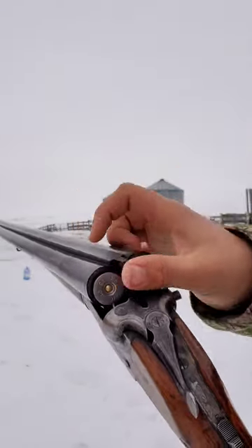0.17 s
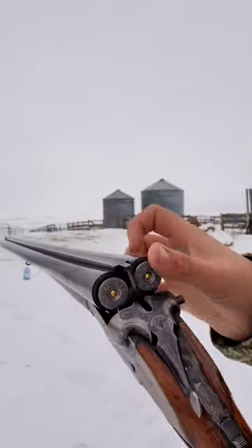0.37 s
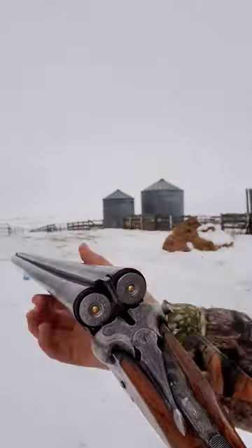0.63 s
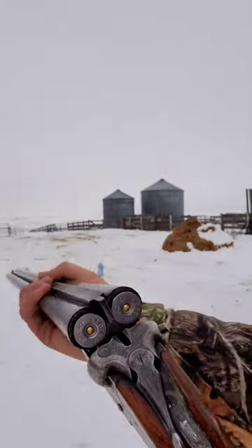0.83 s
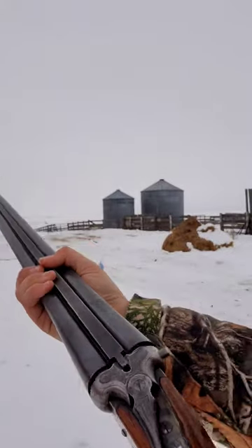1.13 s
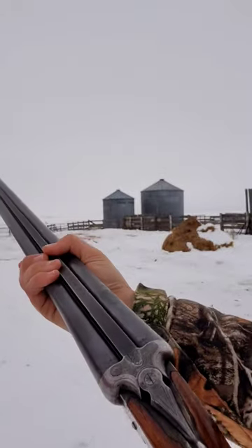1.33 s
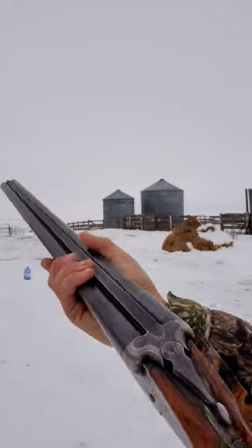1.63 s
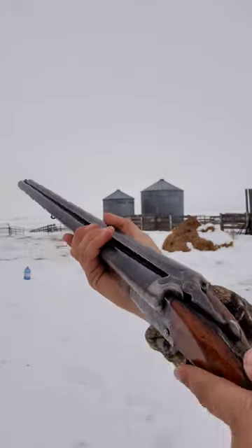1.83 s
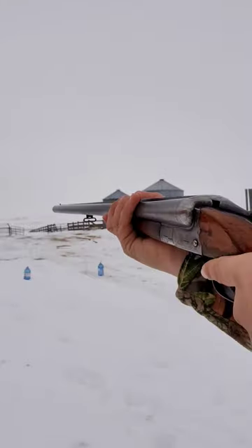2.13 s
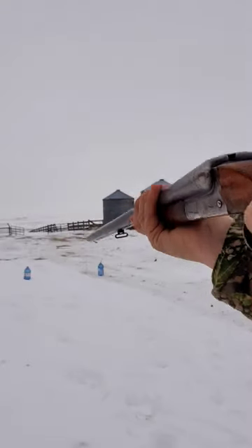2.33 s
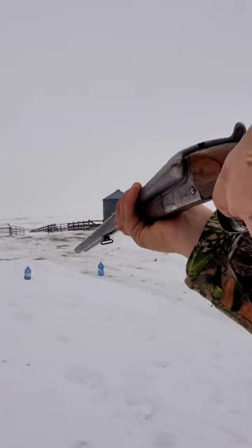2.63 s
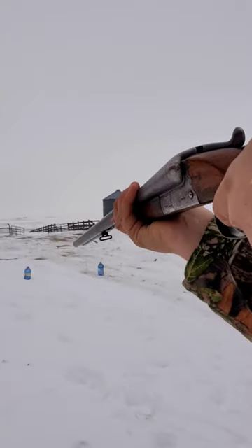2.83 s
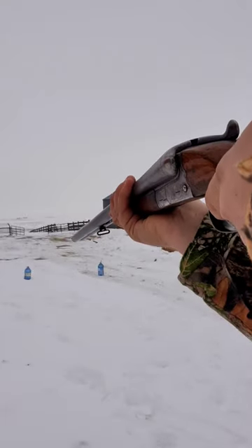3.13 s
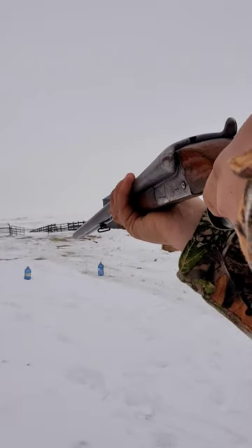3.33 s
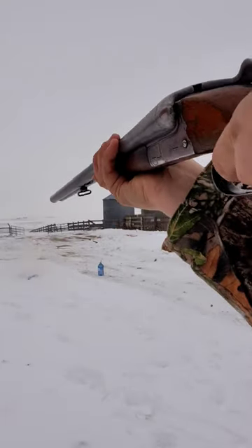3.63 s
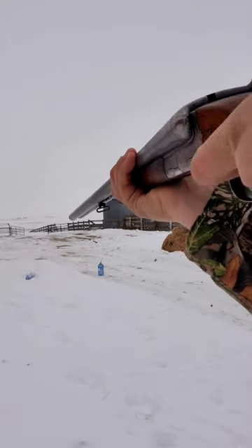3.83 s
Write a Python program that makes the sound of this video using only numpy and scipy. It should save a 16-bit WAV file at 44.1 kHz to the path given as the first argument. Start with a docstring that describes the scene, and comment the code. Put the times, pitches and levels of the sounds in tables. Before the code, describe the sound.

Close stereo microphone outdoors with faint hiss and low wind buffets; metallic shell clicks, a hard gun-closing clack, soft cloth and hand ticks, near quiet, then a booming gunshot with sharp echoes, cut off at the end.

```python
"""A double-barrelled shotgun on a snowy field, an arm's length from a two-port camera microphone.
Shells snap into the breech, the action rattles and clacks shut, a jacket rustles as the gun is raised,
wind buffets the ports; then the shot: a boom, a roar and sharp slaps coming back from bins and fences.
Metal is struck decaying modes, cloth and wind are shaped noise, knocks are noise bursts in a narrow band;
the blast is four noise layers with slaps, thumps and gliding whines."""
import sys
import numpy as np
from scipy import signal
from scipy.fft import rfft, irfft
from scipy.io import wavfile
from scipy.ndimage import uniform_filter1d

SR = 44100
rng = np.random.default_rng(int(sys.argv[2]) if len(sys.argv) > 2 else 0)


def store_pcm(level_fs):
    """Save levels as 16-bit WAV."""
    pcm = np.round(np.clip(level_fs, -1, 1) * 32767).astype(np.int16)
    wavfile.write(sys.argv[1], SR, np.atleast_2d(pcm).T)


N = 176400
T = np.arange(N) / SR  # seconds

# In every table levels and peaks stand before the left-right split and before the recorder;
# lr_db is left over right. Colours are relative spectra.


def undb(db):
    """Amplitude factor of a level in dB."""
    return 10 ** (np.asarray(db) / 20)


def pan(lr_db):
    """Gains of left and right for a level difference."""
    return undb(np.array([lr_db, -lr_db]) / 2)


def pair(length, like):
    """Noise at the two ports; like is the share of power in common."""
    noise = rng.standard_normal((3, length))
    like = np.clip(like, 0, 1)
    return np.sqrt(like) * noise[0] + np.sqrt(1 - like) * noise[1:]


def colour(noise, table):
    """Shape a noise by (hz, level_db) points, nearly silent outside them; rms 1."""
    hz, db = np.array(table).T
    freq = np.arange(N // 2 + 1) * SR / N + 1e-3
    gain = undb(np.interp(np.log(freq), np.log(hz), db, -90, -90))
    shaped = irfft(rfft(noise) * gain, N)
    return shaped / shaped.std(axis=-1, keepdims=True)


def curve(table, col, outside=-120):
    """One column joined by straight lines in time; a table that reaches 3.9 s holds its last value."""
    rows = np.array(table)
    after = outside if rows[-1, 0] < 3.9 else rows[-1, col]
    return np.interp(T, rows[:, 0], rows[:, col], outside, after)


def walk(rate):
    """Random levels held 1 / rate s and slewed."""
    hold = int(SR / rate)
    steps = np.repeat(rng.standard_normal(N // hold + 1), hold)
    return uniform_filter1d(steps, hold)[:N]


def add(out, start_s, sound):
    """Mix a sound in at its start, cut at the end of the scene."""
    i = int(start_s * SR)
    out[:, i:i + sound.shape[1]] += sound[:, :N - i]


def ring(x, hz, t60):
    """One decaying mode: a resonator that loses 60 dB in t60 seconds."""
    pole = np.exp(2j * np.pi * min(hz, .45 * SR) / SR - np.log(1000) / (t60 * SR))
    return signal.lfilter([1], [1, -pole], x).imag


EDGE_HZ = 1400  # added to 0.71 of the pitch for the top of the broad edge


def bursts(rows, width, like, edge_db, order=2):
    """Short knocks: a snap and a noise burst ring a band (width is bandwidth over pitch), with a broad edge."""
    out, t = np.zeros((2, N)), T[:5000]
    for start_s, peak_db, hz, lr_db, length in rows:
        x = pair(len(t), like) * (t / length) * np.exp(-3 * t / length)
        snap_at = np.arange(len(t)) == int(length * SR / 4)
        x = x + snap_at * min(0.6, 4.1 * width) * np.sqrt(np.sum(x ** 2))
        band = ring(x, hz, np.log(1000) / (np.pi * width * hz))
        limits = [0.22 * hz, min(EDGE_HZ + 0.71 * hz, .4 * SR)]
        edge = signal.sosfilt(signal.butter(order, limits, "band", fs=SR, output="sos"), x)
        knock = band / band.std() + undb(edge_db) * edge / edge.std()
        add(out, start_s, knock * undb(peak_db) * pan(lr_db)[:, None] / np.abs(knock).max())
    return out


HISS_DB = -86
# colour of the microphone hiss: hz, level_db
HISS_COLOUR = [(1200, -4), (3000, 1), (8000, -7.5), (13000, -3.5), (16000, -8.5)]


def hiss():
    """Steady microphone hiss: shaped noise, mostly separate at each port."""
    return colour(pair(N, .2), HISS_COLOUR) * undb(HISS_DB)


# wind and handling on the ports: time_s, level_db (before a 1.5 dB lift), lr_db
WIND = [(0.0, -49, 4), (0.1, -53.5, -15), (0.16, -50.5, 5), (0.2, -31, 2), (0.3, -69.5, 2.5),
        (0.34, -50, 18.5), (0.4, -51.5, 0), (0.48, -48.5, 12.5), (0.59, -54, 1.5), (0.75, -59, 9),
        (0.82, -55.5, -9), (0.99, -43.5, -5), (1.05, -60, 10), (1.19, -55, -8), (1.32, -57.5, 10.5),
        (1.37, -46, -11.5), (1.52, -52, 13.5), (1.59, -59.5, -3), (1.67, -46.5, 5), (1.75, -61.5, 9.5),
        (1.82, -68.5, -12), (1.87, -40.5, 6), (2.08, -64.5, -2), (2.32, -57.5, 9), (2.35, -48, -8),
        (2.46, -66.5, 13), (2.65, -68, 5), (2.78, -56, -5.5), (2.95, -74, 0), (3.02, -59, 16.5),
        (3.18, -69, -1.5), (3.63, -68.5, 4.5), (3.66, -61.5, 17)]
# colour of the wind: hz, level_db
WIND_COLOUR = [(7.1, -42.5), (12, -15), (53, 0.5), (73, 3.5), (104, -7.5), (146, -24), (226, -38),
               (260, -37), (340, -64.5)]


def wind():
    """Low buffeting, partly separate at each port: shaped noise under a level curve."""
    level = undb(curve(WIND, 1) + 1.5)
    return colour(pair(N, .2), WIND_COLOUR) * level * pan(curve(WIND, 2, 0))


# low thuds of gusts and handling on the camera: start_s, peak_db, pitch_hz, lr_db, length_s
THUDS = [(0.181, -43, 68.7, -1, 0.035), (0.203, -38, 70.0, -3, 0.023), (0.964, -43, 64.3, -9, 0.029),
         (1.857, -32.5, 75, -3.5, 0.03)]


def thuds():
    """Narrow low bands rung by brief noise, almost without an edge."""
    return bursts(THUDS, 0.17, 0.39, -67.5)


# jacket rustle in three stretches: time_s, middle_level_db, treble_level_db, lr_db
RUSTLE = [
    [(0.36, -80, -80.5, 0), (0.47, -77.5, -76, -5), (0.54, -79, -82, -1.0), (0.548, -54, -71, -4),
     (0.578, -80.5, -79, 0), (0.798, -61.5, -64.5, -6), (0.89, -73, -75, -2), (1.164, -85.5, -89.5, -2.5),
     (1.24, -79, -81.5, -3.5)],
    [(1.53, -74.5, -79.5, -2.5), (1.682, -83, -90, 0), (1.77, -74, -61.5, 1.5), (1.82, -74.5, -72.5, -5),
     (2.01, -59.5, -60.5, -6), (2.1, -59, -62.5, -2.5), (2.138, -57, -52.5, 0), (2.212, -58, -62, -4.5),
     (2.3, -54, -56.5, 2.5)],
    [(2.3, -54.5, -59.5, 1.5), (2.56, -66, -61, 3.5), (2.712, -77, -73.5, -1.5), (2.796, -58.5, -63, 19.5),
     (2.84, -60, -55.5, 1), (2.874, -69, -71, 3.5), (3.454, -102, -104, -2.5), (3.632, -102, -104, 0.5),
     (3.66, -79, -78.5, 1.5)],
]
# colour of the middle of the rustle: hz, level_db
RUSTLE_COLOUR = [(710, -31), (1200, -3), (2100, -6), (2290, -4), (2940, -0.5), (3800, -4.5), (4940, -29.5)]
# colour of its treble: hz, level_db
TREBLE_RUSTLE_COLOUR = [(2000, -32.5), (3400, -6), (4350, -1.5), (5970, -2.5), (10200, -24.5),
                        (12000, -14.5), (14400, -16), (15200, -19), (16000, -28.5)]
# duller part of the rustle: time_s, level_db
RUB = [(0.0, -78), (0.77, -67.5), (1.02, -75), (1.26, -73.5), (1.4, -69), (1.8, -74), (1.94, -64.5),
       (2.14, -58), (2.34, -57.5), (2.73, -63), (2.91, -70), (3.37, -78), (3.66, -81)]
# colour of the duller part: hz, level_db
RUB_COLOUR = [(88, -36), (150, -2), (247, -4), (369, 2), (411, 1), (1810, -14.5), (2000, -10.5),
              (2600, -35)]
GRAINS_PER_S, GRAIN_SPREAD_DB, FLICKER_DB = 350, 3.6, 3.1


def jacket():
    """Dense fabric grains; treble, middle and dull parts swell together and flicker alone."""
    grain_db = np.minimum(GRAIN_SPREAD_DB * rng.exponential(size=N), 13.)
    grains = (rng.random(N) < GRAINS_PER_S / SR) * undb(grain_db)
    grit = 1 + uniform_filter1d(grains, size=40) * 8
    grit = grit / np.sqrt(np.mean(grit ** 2))
    swell_db = 0.4 * walk(16)
    rows = np.concatenate(RUSTLE)
    treble_db = curve(rows, 2, -85.0) + FLICKER_DB * walk(40)
    treble = colour(pair(N, 0.14), TREBLE_RUSTLE_COLOUR) * grit * undb(treble_db)
    middle_db = curve(rows, 1, -84.0) + FLICKER_DB * walk(40)
    middle = colour(pair(N, 0.068), RUSTLE_COLOUR) * grit * undb(middle_db)
    dull = colour(pair(N, 0.33), RUB_COLOUR) * undb(curve(RUB, 1) + 2.2 * walk(31))
    scuff = ring(pair(N, 0.11), 5900, 0.0021)  # a bright rub that comes and goes
    scuff_db = curve(rows, 2, -83.5) - 7.5 + 3.5 * walk(45)
    treble = treble + scuff / scuff.std() * grit * undb(scuff_db)
    return (treble + middle + dull) * undb(swell_db) * pan(curve(rows, 3, 0))


# small ticks of fingers and cloth: start_s, peak_db, pitch_hz, lr_db, length_s
TICKS = [(0.448, -66, 1590, -4, 0.0022), (0.566, -50.5, 3170, -10, 0.0019), (0.619, -59, 3140, -7, 0.0023),
         (0.661, -47.5, 4900, -18, 0.0028), (0.72, -52, 5200, -13, 0.0021), (0.741, -52, 2380, -3, 0.0023),
         (0.79, -41, 4700, -12, 0.007), (1.761, -52, 3810, 0.5, 0.0015), (1.875, -50.5, 3200, -8.5, 0.0015),
         (1.983, -42.5, 890, -6, 0.0021), (2.014, -40, 2300, -5, 0.0029), (2.295, -41.5, 2210, -6, 0.003),
         (2.393, -42, 3600, -4, 0.011), (2.484, -40, 1330, -1, 0.002), (2.508, -43.5, 6100, 15, 0.012),
         (2.754, -40.5, 3260, 3, 0.00164), (2.769, -41, 3200, -10, 0.0021),
         (2.785, -42.5, 5370, -7, 0.0027), (2.797, -36.5, 2900, -7, 0.00098),
         (2.806, -38.5, 2280, 4, 0.0036), (2.818, -50, 5660, 13, 0.0028), (2.828, -37, 5200, -9, 0.0031),
         (2.843, -39, 5070, 15, 0.0018)]
# dull bumps of hands on the wooden stock: start_s, peak_db, pitch_hz, lr_db, length_s
BUMPS = [(0.33, -40.5, 1140, -8.5, 0.00896), (0.658, -54, 380, -8, 0.008), (0.789, -47.5, 453, -8, 0.0075),
         (2.02, -40.5, 520, -12, 0.011), (2.396, -41.5, 680, -2, 0.008), (2.728, -51.5, 154, -8, 0.026),
         (2.786, -41.5, 149, -5, 0.0055)]


def hands():
    """Ticks ring a narrow band with a strong edge; bumps on wood ring a wider one and have little edge."""
    return bursts(TICKS, 0.1, 0.82, -1.5) + bursts(BUMPS, 0.25, 0.64, -46)


# dull knocks of the stock as the lock settles: start_s, peak_db, pitch_hz, lr_db, length_s
STOCK_KNOCKS = [(1.378, -24.5, 1114, -0.5, 0.0035), (1.385, -25, 754, 4, 0.0063),
                (1.404, -33, 4970, 1.5, 0.0011), (1.407, -29, 1480, 0, 0.0064),
                (1.422, -32, 1250, -9.5, 0.004)]


def stock_knocks():
    """Heavily damped knocks: bursts in a band half as wide as its pitch."""
    return bursts(STOCK_KNOCKS, 0.5, 0.49, -26)


RISE_S, PUSH_S, SLIDE_S = .0009, 0.00088, .006  # push rise and decay, growth of the slide-in
LIKENESS, SNAP = 0.27, 5.5  # power shared by the ports; impulse at the top of the push
GRIT_DB, RATTLE_RING_DB = -23.5, -7.5  # push heard as broad noise; share of the rattle that rings the modes
# colour of the broad rattle: hz, level_db
RATTLE_COLOUR = [(190, -38), (330, -5.5), (573, -7.5), (720, -12), (1850, -3.5), (2470, -12), (3900, -5),
                 (7460, -13.5), (9830, -20), (14800, -17), (16000, -29)]


def metal(hits, modes):
    """Parts slide together, a snap and a short gritty push ring the modes, a broad uneven rattle thins out."""
    out, drive = np.zeros((2, N)), np.zeros((2, N))
    t = T[:6000] - .03  # contact at zero
    for hit_s, peak_db, lr_db, rattle_db, rattle_t60, slide_db in hits:
        push = np.clip(t / RISE_S, 0, 1) ** 2 * np.exp(-np.maximum(t - RISE_S, 0) / PUSH_S)
        uneven = uniform_filter1d(np.repeat(rng.standard_normal(60), 100), size=60)
        rattle = undb(rattle_db - 60 * t / rattle_t60)
        slide_in = undb(slide_db) * np.exp(np.minimum(t, 0) / SLIDE_S)
        loose = np.where(t > 0, rattle, slide_in)
        x = pair(len(t), LIKENESS) * (push + loose * undb(RATTLE_RING_DB + 2.7 * uneven))
        x = x + SNAP * (np.arange(len(t)) == np.argmax(push))
        rung = 0
        for hz, mode_db, t60 in modes:
            mode_gain = undb(mode_db + 2 * rng.standard_normal()) / t60 ** 1.54
            # two resonators in a row soften the onset
            rung = rung + mode_gain * ring(ring(x, hz, t60), hz, 0.63 * t60)
        gain = undb(peak_db) * pan(lr_db)[:, None]
        add(out, hit_s + t[0], rung * gain / np.abs(rung).max())
        add(drive, hit_s + t[0], (loose * undb(1.4 * uneven) + undb(GRIT_DB) * push) * gain)
    return out + colour(pair(N, LIKENESS), RATTLE_COLOUR) * drive


# The hit tables: hit_s, peak_db of the ringing, lr_db, rattle_db and slide_in_db relative to the push;
# column order: hit_s, peak_db, lr_db, rattle_db, rattle_t60_s, slide_in_db
# The mode tables: hz, level_db (before a 2 dB random spread and a weight by decay), t60_s
# shells seating and ticking in the breech: hits, then modes
SHELL_HITS = [(0.0326, -3.5, -4, -25.5, 0.034, -26.5), (0.0388, -22.5, 7, -18.5, 0.074, -39),
              (0.047, -30, -15.5, -6, 0.055, -36), (0.0515, -21, 4.5, -18.5, 0.051, -23),
              (0.2885, -58, -3, -6.5, 0.059, -37), (0.32, -45, 1, -17, 0.032, -36),
              (0.3258, -24, 0, -18.5, 0.044, -31), (0.5504, -54.5, 0, -28, 0.06, -36)]
SHELL_MODES = [(410, -18, .012), (1300, -19, 0.01), (2010, -22, 0.011), (3286, 5, 0.0082),
               (4524, 3.5, .007), (6200, -10, 0.011), (7160, -9, .006), (12210, -14, 0.006),
               (15950, -12, 0.0046)]


def shells():
    """Shells dropping home against the breech ring short, bright modes."""
    return metal(SHELL_HITS, SHELL_MODES)


# the hinge creeping shut: hits, then modes (columns as for the shells)
HINGE_HITS = [(1.2575, -36.5, -1, -27, 0.045, -22.5), (1.2675, -23, -3, -18, 0.036, -34),
              (1.2705, -19, -1.5, -24.5, 0.036, -43), (1.2815, -24.5, 4, -12.5, 0.043, -35.5),
              (1.296, -30, -7.5, -19, .05, -28), (1.3025, -30, -0.5, -18.5, 0.058, -26),
              (1.3095, -31, 2.5, -15, 0.057, -30), (1.327, -29, -3, -12, 0.034, -30.5),
              (1.348, -35, -3.5, -6.5, 0.037, -21.5)]
HINGE_MODES = [(1180, -7.5, .01), (1730, 5.5, 0.0086), (2620, -7, 0.008), (4000, 8, 0.0095),
               (4750, 5.5, 0.007), (5500, 1.5, 0.008), (6900, -5.5, .006), (11600, -25.5, .008),
               (15000, -12.5, 0.0066)]


def hinge():
    """A run of small contacts in the closing hinge rings its modes."""
    return metal(HINGE_HITS, HINGE_MODES)


# the lock catching: hits, then modes (columns as for the shells)
LOCK_HITS = [(1.3665, -36, -5, -3.5, 0.062, -20.5), (1.372, -5, 0.5, -20, 0.049, -16),
             (1.394, -20.5, -3.5, -10.5, 0.043, -27.5), (1.411, -32, -3, -18.5, 0.11, -25),
             (1.506, -51, -11, -26, .05, -28)]
LOCK_MODES = [(486, -15, 0.032), (1120, 6, 0.013), (1860, 1, 0.02), (2800, 4, 0.0039), (4300, -2.5, 0.009),
              (5025, -1, 0.009), (6750, -3, 0.006), (7920, -5, 0.0045), (11450, -9.5, 0.0031),
              (14920, -3, 0.0039)]


def lock():
    """The lock clacks shut: one strong hit among weaker ones, with lower, longer modes."""
    return metal(LOCK_HITS, LOCK_MODES)


# gliding whines in the echoes: start_s, level_db (before wavering), start_hz, end_hz, lr_db, length_s
WHINES = [(3.679, -18, 800, 710, 16, 0.021), (3.676, -28, 3300, 3400, 15, 0.025),
          (3.774, -38.5, 5880, 5120, -10, .055), (3.772, -32, 4200, 3800, -3, 0.046),
          (3.8015, -19, 1430, 1330, -4, 0.0038), (3.8095, -18.5, 1340, 1360, -1, 0.0056),
          (3.896, -37, 1960, 2030, -2, 0.0091), (3.908, -35, 2400, 2040, -2, 0.013),
          (3.923, -31.5, 2050, 2010, -4, 0.011)]


def whines():
    """Slightly wavering tones that swell fast, glide and fade."""
    out = np.zeros((2, N))
    for start_s, level_db, start_hz, end_hz, lr_db, length in WHINES:
        u = np.arange(int(length * SR)) / (length * SR)
        waver = uniform_filter1d(rng.standard_normal((3, 4000)), size=60)[:, :len(u)]
        glide_hz = (start_hz + (end_hz - start_hz) * u) * (1 + .07 * waver[0])
        phase = 2 * np.pi * np.cumsum(glide_hz) / SR
        port_phase = np.array([[0], [.9]])  # radians
        tone = np.sin(phase + port_phase) * undb(level_db + 22 * waver[1:])
        add(out, start_s, tone * np.sin(np.pi * u ** 0.8) * pan(lr_db)[:, None])
    return out


# low thumps of the blast: start_s, peak_db, pitch_hz, lr_db, length_s
THUMPS = [(3.677, -16.5, 90, 12.5, .014), (3.687, -14, 319, 1, 0.011), (3.702, -12, 198, 2, 0.0087),
          (3.7505, -13.5, 172, 1, 0.0082)]


def thumps():
    """Low, wide bands punched by brief noise."""
    return bursts(THUMPS, 0.48, 0.41, -28)


# slaps of the blast and its echoes: start_s, peak_db, pitch_hz, lr_db, length_s
SLAPS = [(3.696, -1.5, 2450, -13, 0.0014), (3.703, -6, 2930, -7, 0.0034), (3.7185, -20, 2530, 6, 0.0014),
         (3.7312, -14, 4940, -20, 0.0011), (3.736, -9, 920, 1, 0.0029), (3.738, -2.5, 3500, -5, 0.00375),
         (3.749, -1, 3040, 4, 0.002), (3.7503, 6.5, 4750, 5.5, .0022), (3.762, -10, 5340, -21, 0.0016),
         (3.789, -19, 850, 1, 0.0037), (3.826, -11, 1300, -2, .003), (3.8278, -15.5, 4070, -4, 0.0012),
         (3.834, -16.5, 2260, -8.5, 0.0026), (3.841, -16, 664, 0.5, 0.0016),
         (3.8555, -16.5, 703, 6, 0.0015), (3.8558, -21, 3700, 0, 0.0012), (3.8915, -17, 3470, 0, 0.00066),
         (3.904, -20.5, 2930, 1, 0.0015), (3.9178, -24.5, 4750, -12, 0.0015),
         (3.9265, -18, 3580, 1, 0.00071), (3.9928, -22, 3550, -2, 0.003)]


def slaps():
    """Sharp noise bursts in a narrow band, each with a broad edge."""
    return bursts(SLAPS, 0.14, 0.26, -6.0, order=3)


# levels of the blast (body, roar and treble before roughening):
# time_s, boom_db, body_db, roar_db, treble_db, body_lr_db, roar_lr_db (also for the treble)
SHOT = [(3.662, -57, -61, -61, -64, 2, -3), (3.672, -43, -39, -36.5, -45, -20, -14),
        (3.686, -22.5, -27, -23.5, -28, 15, 11.5), (3.704, -26, -12, -15, -21.5, -3.5, -12.5),
        (3.713, -24, -24.5, -22, -26.5, -14, 6), (3.726, -34, -26, -30.5, -27.5, -6, -9),
        (3.738, -18, -39, -18, -30.5, 3, 7), (3.745, -25, -47, -32.5, -27, 1, -3),
        (3.753, -26, -44, -27, -39, 6, -0.5), (3.766, -30, -46, -28, -39.5, -18, -10),
        (3.785, -30, -41.5, -35, -41, -12, -1), (3.82, -47, -33, -36, -47, -2, 1),
        (3.84, -31, -27, -31.5, -51, 2, -1), (3.85, -45, -43, -45, -52, 3, 8),
        (3.87, -53, -33.5, -46.5, -58, 0.5, -2), (3.91, -40, -45, -40.5, -67, -2, -4),
        (3.94, -57, -38, -45, -69, -0.5, -1), (3.97, -63, -46, -51.5, -69, -3, 2),
        (4.0, -40, -35, -51, -78, 1, -3)]
# colours of boom, body, roar and treble, each: hz, level_db
BOOM_COLOUR = [(24, -35.5), (40, 2.5), (130, 2), (178, -1.5), (216, -3.5), (308, -4), (333, -2),
               (400, -9.5), (520, -36)]
BODY_COLOUR = [(120, -36), (200, -8.5), (240, -9), (310, -10), (350, -3), (430, -11.5), (520, -13),
               (640, -4.5), (760, -3.5), (900, -3), (1050, -9), (1340, -9.5), (1800, -7), (2340, -18.5)]
ROAR_COLOUR = [(710, -36.5), (1200, -8), (1340, -11), (1750, -3), (2760, -2), (4470, -3), (4860, -7.5),
               (5160, -6.5), (5810, -10.5), (9000, -33), (11700, -30.5), (19800, -120)]
TREBLE_COLOUR = [(4410, -8), (7500, -2), (9390, -21), (11000, -12.5), (13300, -5), (14700, -7.5),
                 (15600, -9), (16000, -15.5)]
ROUGH_DB = 3.  # size of the fast random level changes


def shot():
    """Boom, body, roar and treble of the blast rolling over the field, with its slaps, thumps and whines."""
    boom = colour(pair(N, .15), BOOM_COLOUR) * undb(curve(SHOT, 1)) * pan(3.5)[:, None]
    out = slaps() + whines() + thumps() + boom
    # colour, share in common, level column, left-right column
    layers = ((BODY_COLOUR, .25, 2, 5), (ROAR_COLOUR, .3, 3, 6), (TREBLE_COLOUR, .15, 4, 6))
    for table, like, level_col, lr_col in layers:
        level = undb(curve(SHOT, level_col) + ROUGH_DB * walk(250))
        out = out + colour(pair(N, like), table) * level * pan(curve(SHOT, lr_col, 0))
    return out


def scene():
    """Field and microphone, then the shooter, the action and the shot."""
    background = hiss() + wind() + thuds()
    shooter = jacket() + hands()
    action = stock_knocks() + shells() + hinge() + lock()
    return background + shooter + action + shot()


TOP_HZ = 15900  # upper limit of the recorder


def record(dry):
    """The recorder rounds the loudest peaks and cuts the top."""
    rounded = np.tanh(1.17 * dry) / 1.29
    return signal.sosfilt(signal.ellip(8, .2, 70, TOP_HZ, fs=SR, output="sos"), rounded)


dry = scene()
out = record(dry)
store_pcm(out)
```